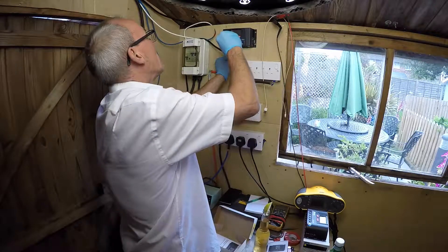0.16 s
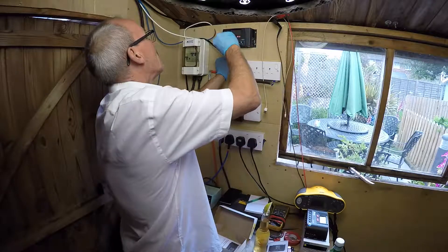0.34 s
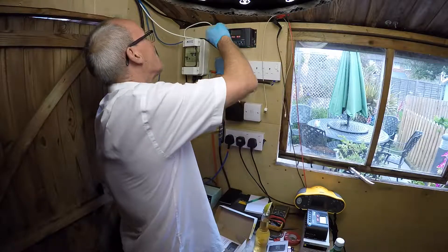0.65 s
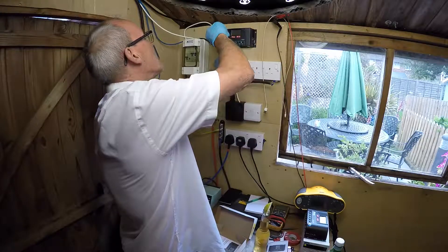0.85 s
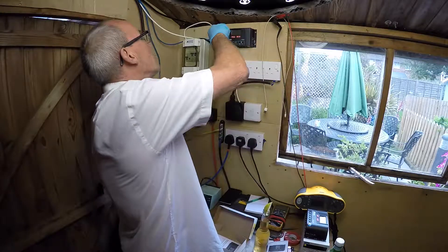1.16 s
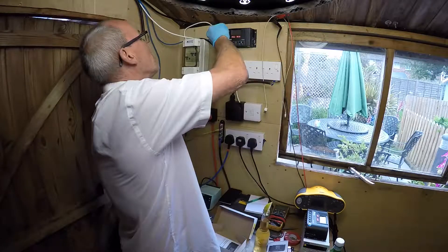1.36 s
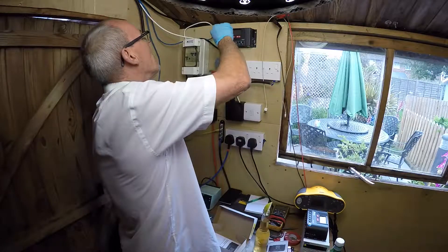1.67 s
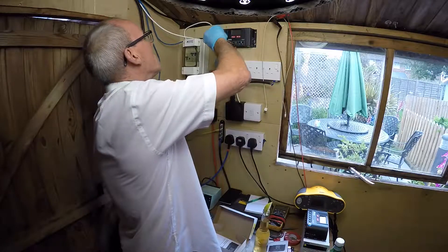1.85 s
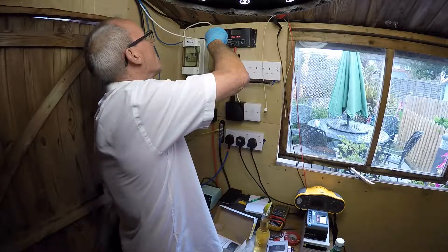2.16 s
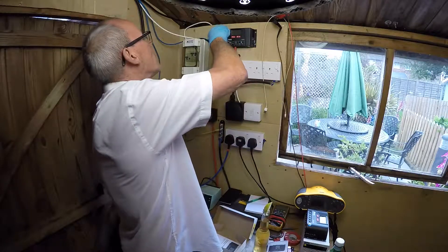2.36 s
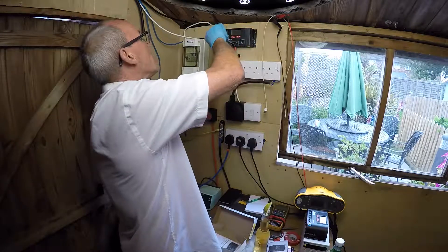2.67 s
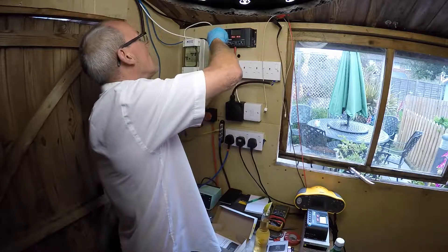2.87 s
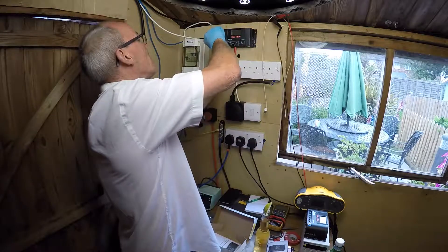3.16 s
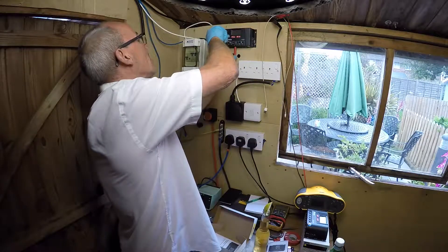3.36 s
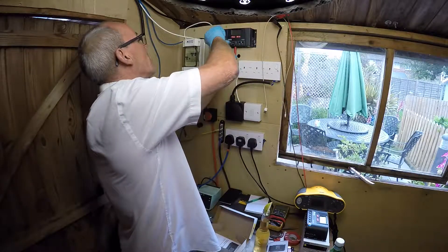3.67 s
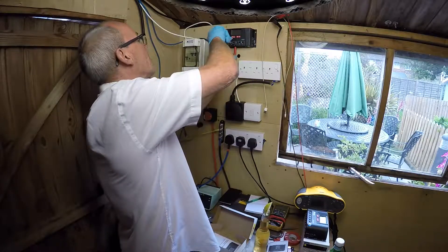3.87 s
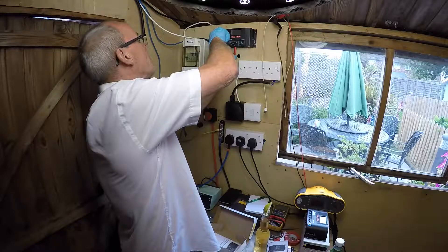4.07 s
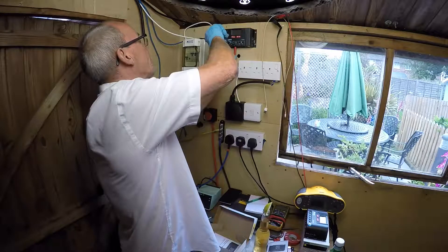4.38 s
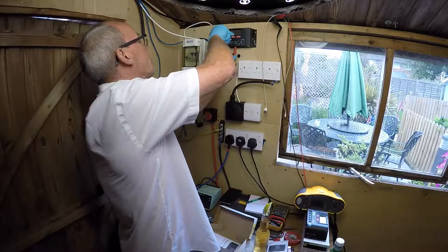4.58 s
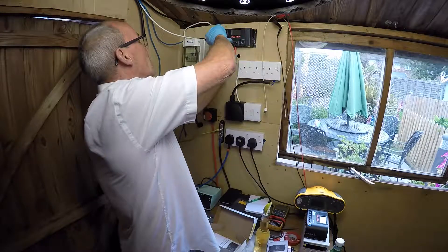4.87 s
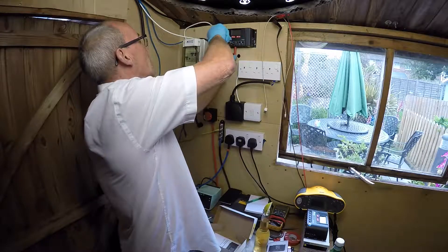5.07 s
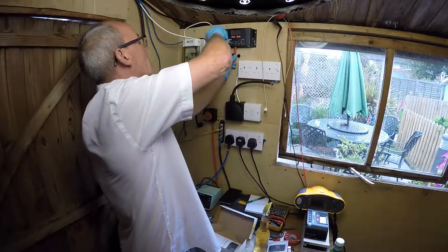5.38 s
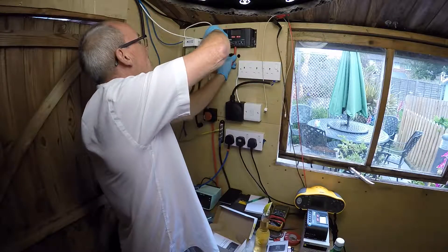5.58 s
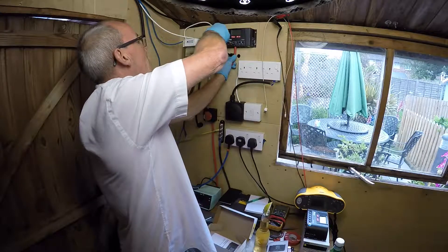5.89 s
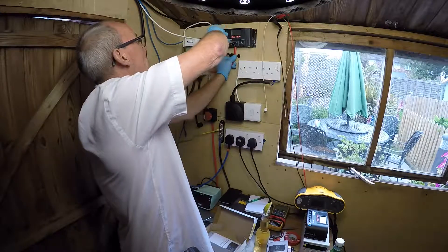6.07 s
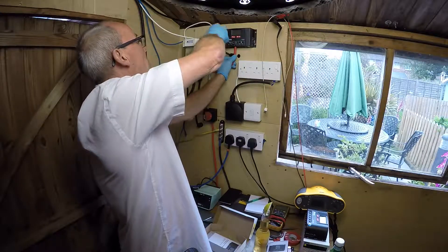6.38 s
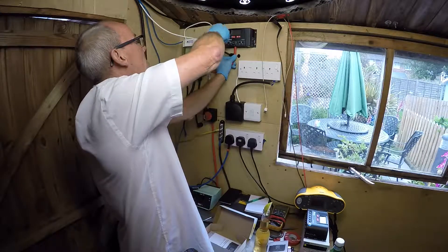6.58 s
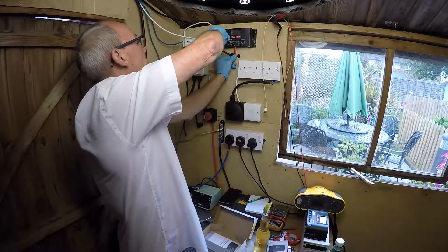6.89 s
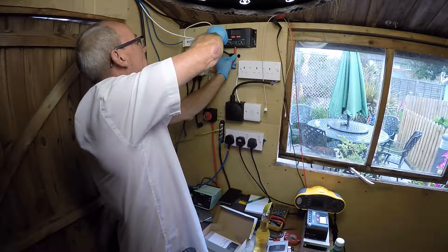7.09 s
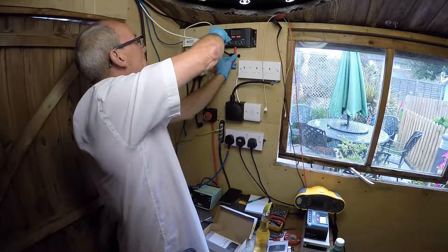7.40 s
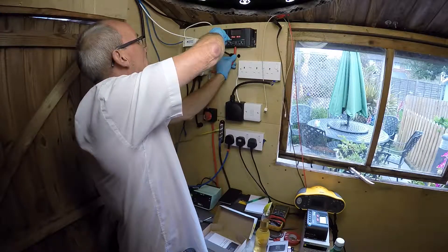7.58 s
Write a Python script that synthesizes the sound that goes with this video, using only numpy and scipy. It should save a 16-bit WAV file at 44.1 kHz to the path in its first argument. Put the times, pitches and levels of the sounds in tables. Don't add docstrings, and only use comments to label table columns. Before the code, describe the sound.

Knocks, a metallic clink and small scrapes as a wire is screwed onto a wall terminal in a small wooden shed, over faint hum and hiss.

```python
import sys
import numpy as np
from scipy import signal
from scipy.fft import rfft, irfft
from scipy.io import wavfile
from scipy.ndimage import uniform_filter1d

SR = 44100
rng = np.random.default_rng(int(sys.argv[2]) if len(sys.argv) > 2 else 0)


def transcribe(signal):
    frames = np.atleast_2d(signal).T
    limited = np.clip(frames, -1, 1)
    pcm = np.round(limited * 32767).astype(np.int16)
    wavfile.write(sys.argv[1], SR, pcm)


N = 341334
RING_S = 0.45

RUMBLE_DB = (-45.5, -66)
# peak_s, deep_db, upper_db, length_s
SHUDDERS = [
    (0.03, -48, -48, 0.046),
    (0.398, -43, -45, .07),
    (1.563, -59, -52, 0.043),
    (2.069, -44.5, -32.5, 0.022),
    (2.117, -34, -38, 0.11),
]
# pitch_hz, level_db
HUM = [(199.2, -72), (247.6, -73.0), (300.5, -69.5), (500.6, -65.0), (699.8, -84.5), (798, -77),
       (963.6, -90.5), (1319, -83.5), (100, -75.0), (150, -72.0)]
# frequency_hz, density_db (per Hz)
HISS = [(32, -30), (55, -9.5), (114, -13), (290, -17.5), (620, -18.5), (1110, -24), (5010, -29.5),
        (15100, -40)]
# centre_hz, width_hz, level_db
THROAT = [(1820, 350, -3), (2120, 190, -2.5), (2510, 530, 0.5), (5300, 980, -13.5)]
# peak_s, length_s, swish_db, rub_db
RUSTLE = [(1.21, .04, -73, -61.5), (1.308, .05, -79, -70), (1.453, 0.062, -88.5, -65),
          (2.393, 0.071, -67, -67), (2.652, 0.084, -69.5, -63.5), (2.788, .03, -79, -65),
          (2.839, 0.05, -67.5, -66), (2.969, 0.06, -70, -64.5), (3.254, 0.091, -69.5, -61.5),
          (3.422, .05, -73.5, -77), (3.524, .08, -72.5, -70), (3.825, 0.16, -71.5, -62),
          (4.009, .035, -67.5, -69.5), (4.136, .055, -69, -68.5), (4.392, 0.1, -74, -61.5),
          (4.475, 0.068, -74, -61.5), (4.591, .035, -66, -74.5), (4.692, 0.025, -70, -64.5),
          (4.756, 0.092, -70, -65), (5.002, 0.11, -78, -63), (5.16, 0.044, -77.5, -66),
          (5.252, 0.055, -70, -68.5), (5.431, 0.12, -71, -64.5), (5.525, 0.043, -79.5, -62),
          (5.782, 0.024, -67.5, -65), (6.055, 0.11, -67.5, -61), (6.685, 0.11, -69.5, -62),
          (6.813, 0.16, -76, -69.5), (7.425, 0.034, -79, -64.5), (7.474, 0.068, -72.5, -64)]
# centre_hz, width_hz, level_db
GLOVE = [(1500, 2800, -1), (3960, 1200, -6)]
# start_s, level_db, resonance_hz, width_hz, length_s
SLIPS = [(0.524, -64, 606, 497, 0.042), (1.438, -65, 1500, 404, 0.038), (2.328, -62, 5100, 1500, 0.054),
         (2.616, -56, 1500, 2010, 0.059), (3.22, -65.5, 4100, 510, 0.09), (3.777, -58, 4000, 400, 0.044),
         (4.374, -60, 790, 689, 0.14), (4.949, -65, 1794, 2000, 0.24), (5.291, -62, 4300, 1500, 0.053),
         (5.266, -64, 890, 895, 0.1), (6.068, -42, 676, 89, 0.062), (6.075, -53, 345, 120, 0.044),
         (6.65, -59, 2320, 250, 0.043), (6.635, -48, 593, 400, 0.048), (7.403, -60, 4900, 1200, .03)]
# centre_hz, level_db, t60_s
SHED = [(138.5, -15.5, .3), (278, -1, 0.16), (530, 3, 0.19), (1100, 1, 0.17), (2150, -0.5, 0.18),
        (4060, -3, 0.15), (7600, -12.5, 0.15), (13900, -31.5, 0.11)]
# pitch_hz, level_db, t60_s
TOOL = [(111, 11, 0.043), (300, 6, 0.26), (590, 4, 0.28), (708, 8, 0.13), (1260, 2, .1), (1900, 9.5, 0.11),
        (2200, 8, 0.039), (3203, 8, 0.085), (4090, 7, 0.023), (2690, -2, 0.11), (5250, -16, 0.03)]
# start_s, energy_db, contact_ms
CLINK = [
    (0.3576, -55.5, 0.074),
    (0.3657, -55.5, 0.1),
    (.384, -61, 0.091),
]
# pitch_hz, level_db, t60_s
BOX = [(510, 16, 0.016), (958, -10.5, 0.036), (1545, 7, 0.022), (2260, -4, 0.023), (3220, -11.5, 0.015),
       (4350, -8.5, 0.02), (5760, -13, 0.025), (5955, -19.5, 0.0287), (9500, -22, .005)]
# pitch_hz, level_db
BOARDS = [(245, -6), (301, 1.5), (406, -15.5), (441, -3.5), (494, 6), (564, -3.5), (691, 2), (746, -9),
          (810, -7.5), (961, -3.5), (1022, -19), (1241, -11.5), (1368, -11), (1400, -9.5),
          (1487, -15), (1528, -7.5), (1573, -28), (1640, -23), (1777, -7.5), (1865, -25), (2191, -7),
         (2290, -20), (2411, 0), (2640, -12.5), (2830, -18.5), (2950, -19), (3230, -21)]
# delay_ms, level_db
WALLS = [(4.5, -5), (11, -8.5), (17, -12.5), (26, -7.5), (33, -12.5)]
# start_s, energy_db, board_db, click_db, tick_db (colours relative to the energy)
KNOCKS = [(0.001, -64, 0.5, -3.5, -9.5), (1.471, -68, -1, -9, -33), (1.499, -43, 0, -6, -20),
          (2.0593, -34, -0.5, -3.5, -9), (2.6132, -71.5, 1, 0.5, -4), (3.7402, -83.5, 0, -0.5, -12),
          (5.9616, -55, -2.5, -7, -18.5), (6.146, -54, -3, -8, -22.5), (6.5447, -78, -3, -1.5, -7),
          (6.6291, -73, 3, -6, -21), (7.471, -67, -3, -16, -14.5), (7.571, -67.5, -2.5, -3, -8)]
# start_s, energy_db, board_db (relative to the energy)
TAPS = [(0.3486, -83, 12.5), (0.46, -76.5, 18.5), (0.5176, -82, 13), (0.547, -84, 16), (0.9234, -73.5, 6.5),
        (1.737, -73, 3.5), (2.645, -80, 8), (3.172, -81.5, 1.5), (3.3843, -89, 8), (4.3334, -75, 3),
        (4.3697, -81, 10.5), (4.9368, -82, 3), (5.262, -72.5, 6), (5.35, -81, 2), (5.49, -83.5, 5.5),
        (6.7611, -84.5, 13.5)]


def undb(db):
    return 10 ** (np.asarray(db) / 20)


def level(x, db):
    return x * undb(db) / np.sqrt(np.mean(x ** 2))


def band(x, lo_hz, hi_hz, order=2):
    edges_hz = [lo_hz, min(hi_hz, 0.45 * SR)]
    return signal.sosfilt(signal.butter(order, edges_hz, "band", fs=SR, output="sos"), x)


def walk(rate_hz):
    hold = int(SR / rate_hz)
    steps = np.repeat(rng.standard_normal(N // hold + 1), hold)
    return 3.05 * uniform_filter1d(uniform_filter1d(steps, hold), hold)[:N]


def bumps(peak_s, length_s, db, rise, fall):
    power, t = np.zeros((len(db), N)), np.arange(N) / SR
    for k in range(len(peak_s)):
        reach_s = 4 * length_s[k]
        near = slice(max(int((peak_s[k] - reach_s) * SR), 0), int((peak_s[k] + reach_s) * SR))
        u = (t[near] - peak_s[k]) / length_s[k]
        bell = np.exp(-2 * (u / np.where(u < 0, rise, fall)) ** 2)
        power[:, near] += undb(2 * db[:, k, None]) * bell
    return np.sqrt(power)


def fade(t60_s):
    return np.exp(-np.log(1000) * np.arange(int(RING_S * SR)) / SR / t60_s)


def ring(modes, rise_ms):
    t = np.arange(int(RING_S * SR)) / SR
    lines = sum(undb(db) * np.sin(2 * np.pi * (hz * t + rng.random())) * fade(t60_s)
                for hz, db, t60_s in modes)
    return lines * np.tanh(t * 1000 / rise_ms)


def shed(build_ms):
    t = np.arange(int(RING_S * SR)) / SR
    tail = 0
    for hz, db, t60_s in SHED:
        octave = band(rng.standard_normal(len(t)), hz / np.sqrt(2), hz * np.sqrt(2))
        tail = tail + level(octave, db) * fade(t60_s)
    return tail * (1 - np.exp(-(t * 1000 / build_ms) ** 2))


def strike(start_s, db, contact_ms, response):
    out, t_ms = np.zeros(N + SR), np.arange(2048) * 1000 / SR
    chatter = rng.standard_normal((len(start_s), 2048))
    for k in range(len(start_s)):
        push = 0.35 * chatter[k] * np.exp(-t_ms / max(contact_ms[k], 0.05))
        push[0] = 1
        i = int(start_s[k] * SR)
        for part_db, part in zip(db[k], response):
            sound = signal.fftconvolve(push, part)
            energy = np.sum(sound ** 2) / SR
            out[i:i + len(sound)] += undb(part_db) * sound / np.sqrt(energy)
    return out[:N]


def air_rumble():
    peak_s, deep_db, upper_db, length_s = np.transpose(SHUDDERS)
    gusts = [undb(db + 0.8 * walk(6.1)) for db in RUMBLE_DB]
    shudders = bumps(peak_s, length_s, np.array([deep_db, upper_db]), 0.4, 1.1)
    deep_gain, upper_gain = np.hypot(gusts, shudders)
    deep = level(band(rng.standard_normal(N), 16.4, 40), -2.9)
    upper = level(band(rng.standard_normal(N), 59.5, 120), 0)
    return deep_gain * deep + upper_gain * upper


def transformer_hum():
    t = np.arange(N) / SR
    hum = np.zeros(N)
    for hz, db in HUM:
        gain = undb(db + 1.5 + 0.6 * walk(5.5))
        hum += gain * np.sin(2 * np.pi * (hz * t + 0.07 * walk(8.5)))
    return hum


def microphone_hiss():
    hz = np.maximum(np.arange(N // 2 + 1) * SR / N, 1)
    point_hz, density_db = np.transpose(HISS)
    colour = undb(np.interp(np.log(hz), np.log(point_hz), density_db))
    hiss = irfft(rfft(rng.standard_normal(N)) * colour, N)
    return level(hiss, -63) * undb(0.325 * walk(12))


def bird(count=8):
    start_s, spacing_s, note_s = 0.0032, 0.1048, 0.035
    level_db, fade_db_per_s = -59, -7
    rasp_hz = 109.7
    n = 2 * SR
    peak_s = start_s + spacing_s * np.arange(count)
    note_db = level_db + fade_db_per_s * peak_s
    notes = bumps(peak_s, np.full(count, note_s), note_db[None], 0.82, 1.0)[0]
    cycle = np.cumsum(rasp_hz * (1 + 0.085 * walk(60)[:n])) / SR % 1
    rasp = rng.standard_normal(n) * (0.19 + np.exp(-cycle / 0.15))
    throat = sum(level(band(rasp, hz - w / 2, hz + w / 2), db) for hz, w, db in THROAT)
    voice = notes[:n] * level(throat, 0)
    garden = rng.standard_normal(int(RING_S * SR)) * fade(0.51)
    wet = signal.fftconvolve(voice, garden / np.sqrt(np.sum(garden ** 2)))[:n]
    return np.pad(voice + undb(0.5) * wet, (0, N - n))


def rustle():
    peak_s, length_s, *db = np.transpose(RUSTLE)
    swish_gain, rub_gain = bumps(peak_s, length_s, np.array(db), 0.5, 0.77)
    crackle_db = 1.5 * rng.standard_normal((2, N // 64 + 1)).repeat(64, axis=1)[:, :N]
    fibres = rng.standard_normal((2, N)) * undb(crackle_db)
    swish = level(band(fibres[0], 6500, 16000, order=1), 0.57)
    glove = sum(level(band(fibres[1], hz - w / 2, hz + w / 2, order=1), level_db)
                for hz, w, level_db in GLOVE)
    return swish_gain * swish + rub_gain * level(glove, 0)


def slips():
    out = np.zeros(N + SR)
    n = SR // 2
    grit = rng.standard_normal((len(SLIPS), n))
    for (start_s, db, hz, width_hz, length_s), noise in zip(SLIPS, grit):
        u = np.arange(n) / SR / length_s
        scrape = level(band(noise, hz - width_hz / 2, hz + width_hz / 2), db)
        i = int(start_s * SR)
        out[i:i + n] += scrape * np.tanh(3.6 * u) * np.exp(-u ** 2)
    return out[:N]


def clink():
    start_s, energy_db, contact_ms = np.transpose(CLINK)
    low_room = undb(1.5) * band(shed(0.8), 150, 4800)
    high_room = undb(-4) * band(shed(0.55), 4500, 13100)
    response = ring(TOOL, 0.64) + low_room + high_room
    return strike(start_s, energy_db[:, None], contact_ms, [response])


def knocks():
    tap_click_db, tap_tick_db = -24, -26
    blows = [*KNOCKS, *[(*tap, tap_click_db, tap_tick_db) for tap in TAPS]]
    start_s, db, board_db, click_db, tick_db = np.transpose(blows)
    box = ring(BOX, 1.0)
    echoes = sum(undb(echo_db) * np.roll(box, int(ms * SR / 1000)) for ms, echo_db in WALLS)
    board_t60_s = 0.11
    boards = ring([(hz, mode_db, board_t60_s) for hz, mode_db in BOARDS], 7.5)
    response = box + echoes + undb(3.0) * boards + undb(-5.5) * shed(0.67)
    edges_hz = [100, 800, 1900, 2850, 16000]
    parts = [band(response, lo, hi, order=3) for lo, hi in zip(edges_hz, edges_hz[1:])]
    part_db = np.transpose([db + board_db, db, db + click_db, db + tick_db])
    contact_ms = np.full(len(start_s), 0.06)
    return strike(start_s, part_db, contact_ms, parts)


def scene():
    background = air_rumble() + transformer_hum() + microphone_hiss()
    handling = rustle() + slips() + clink() + knocks()
    return (background + bird() + handling)[None]


def top_cut(x):
    return signal.sosfilt(signal.butter(12, 15270, fs=SR, output="sos"), x)


def record(dry):
    return top_cut(dry)


dry = scene()
out = record(dry)
transcribe(out)
```